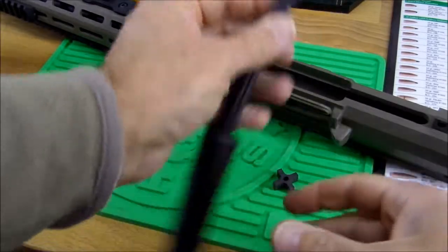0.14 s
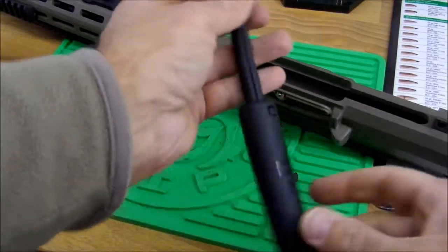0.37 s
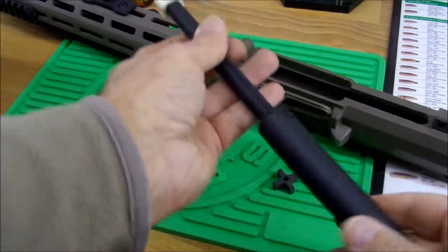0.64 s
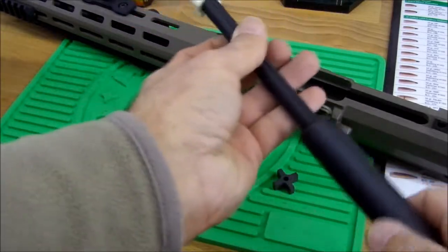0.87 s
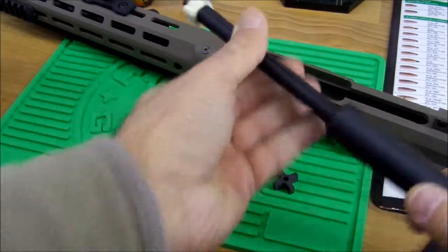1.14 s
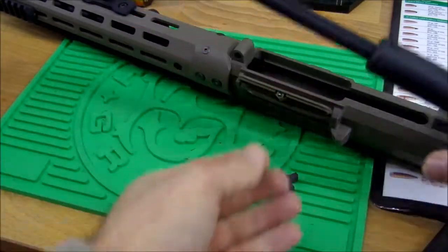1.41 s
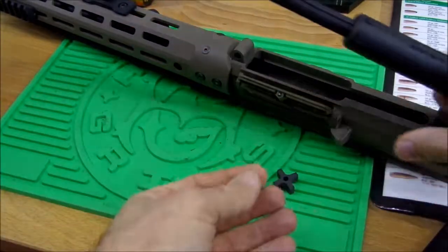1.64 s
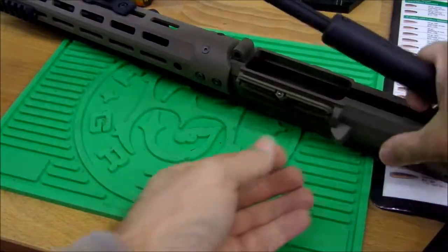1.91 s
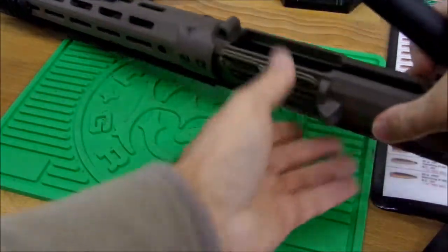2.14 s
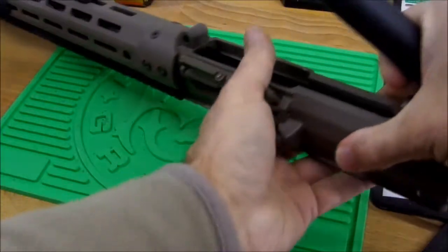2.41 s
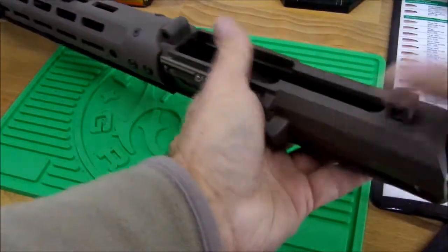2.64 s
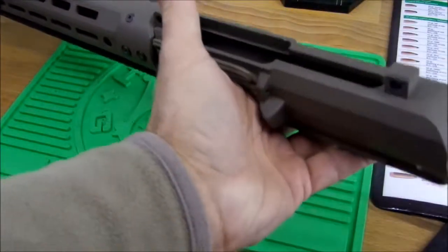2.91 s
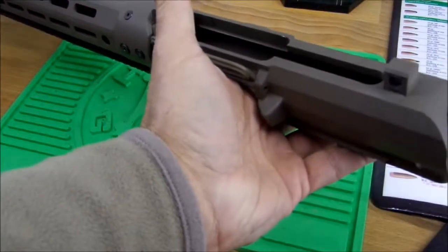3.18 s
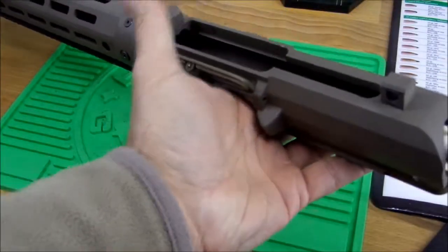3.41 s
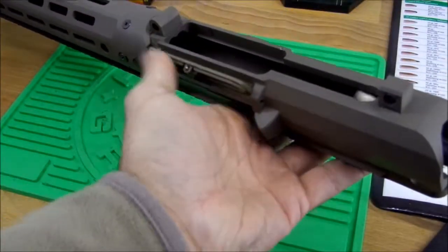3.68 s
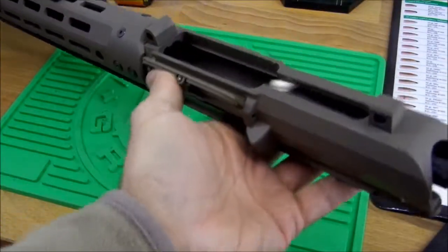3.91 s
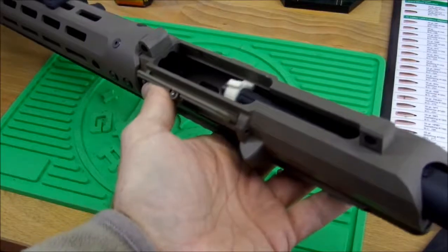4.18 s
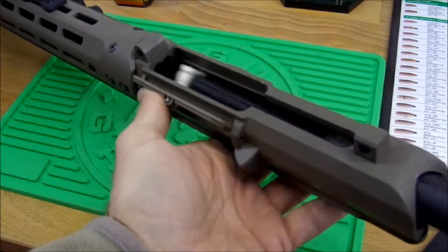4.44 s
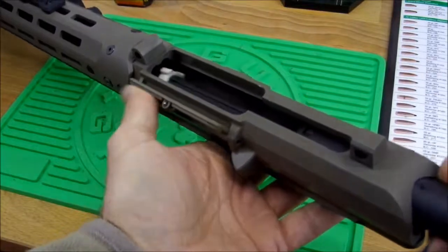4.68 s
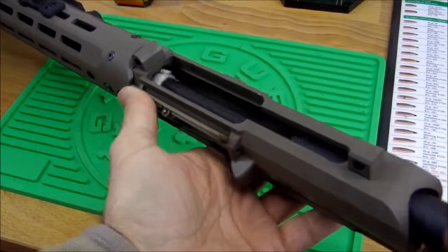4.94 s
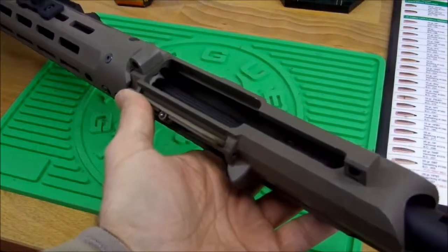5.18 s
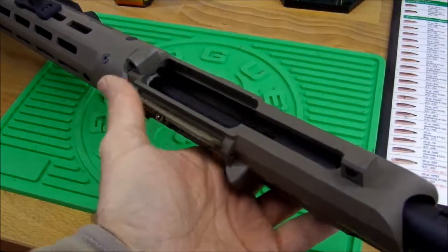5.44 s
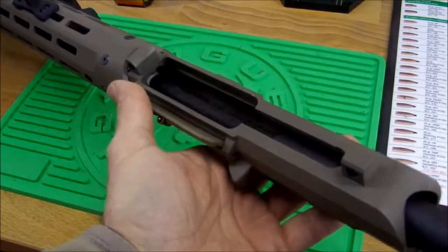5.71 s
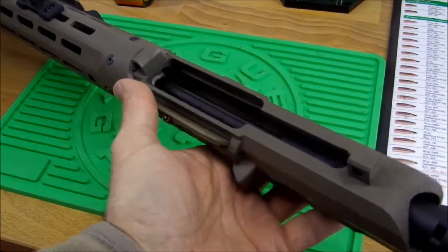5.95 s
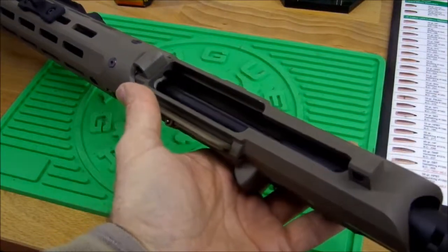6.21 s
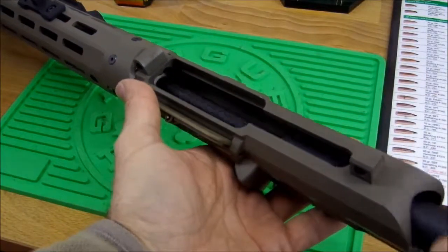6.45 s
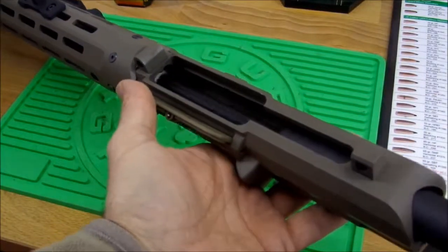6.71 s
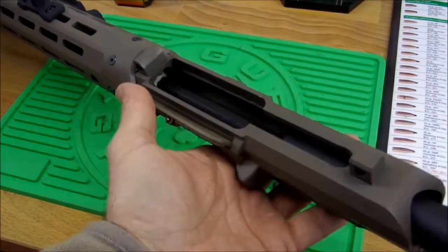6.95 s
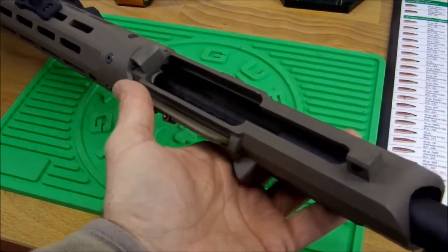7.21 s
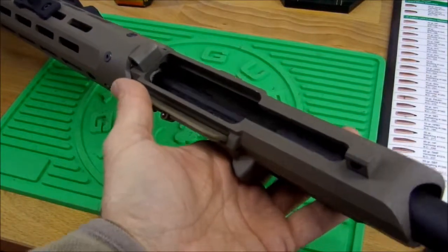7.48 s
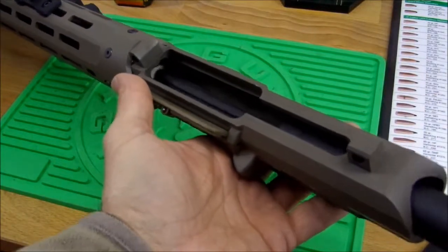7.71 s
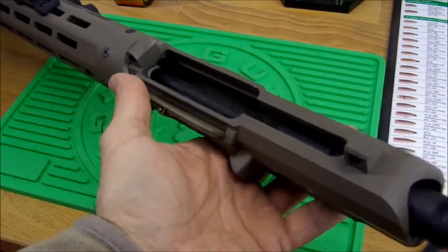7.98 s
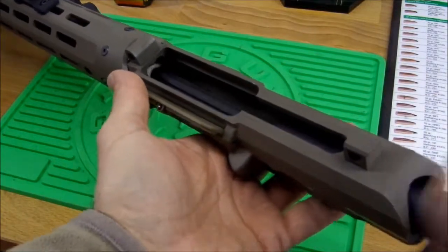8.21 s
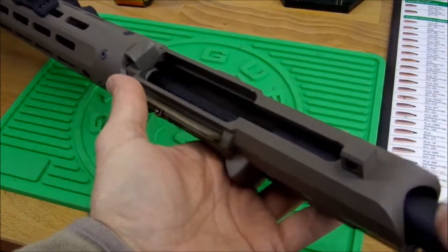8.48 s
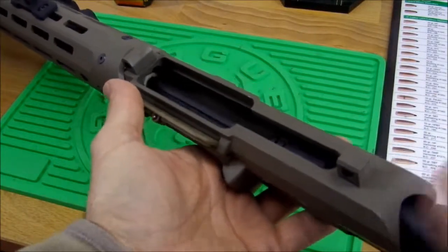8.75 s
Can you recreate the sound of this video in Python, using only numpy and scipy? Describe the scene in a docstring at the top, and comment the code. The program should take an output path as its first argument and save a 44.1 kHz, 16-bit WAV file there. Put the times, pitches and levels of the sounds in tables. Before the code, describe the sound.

Close up in a small quiet room with a faint hum, hands faintly rustle around a plastic rod. A metal part shifts off a rubber mat with light taps, a low thud and a brief chatter. The cloth-tipped rod then slides in with loud hollow clacks, followed by repeated dry scrubbing twists and irregular metallic knocks until the end.

```python
"""Cleaning a hollow metal receiver

A hollow metal receiver is lifted off a rubber mat on a wooden bench; a plastic rod with a cloth tip is slid in
and twisted. Knocks are contact noise plus decaying tube modes; the cloth is shaped noise that also shakes the modes.
Taps, bench thuds, thin rough tones, chatter and squeaks are decaying modes or noise in narrow resonances.
A quiet small room with a faint hum, one close microphone."""
import sys
import numpy as np
from scipy import signal
from scipy.fft import rfft, irfft
from scipy.io import wavfile
from scipy.ndimage import uniform_filter1d

SR = 44100
rng = np.random.default_rng(int(sys.argv[2]) if len(sys.argv) > 2 else 0)


def to_linear_factor(level_db):
    """Convert decibel levels (scalar or array-like) to linear amplitude factors."""
    exponent = np.asarray(level_db, float) / 20
    return 10 ** exponent


def master_out(mix):
    """Clip the mix to full scale and print it as 16-bit PCM to the path in sys.argv[1]."""
    frames = np.transpose(np.atleast_2d(mix))
    ceiling = np.clip(frames, -1, 1)
    pcm = np.round(ceiling * 32767).astype(np.int16)
    wavfile.write(sys.argv[1], SR, pcm)


N = 390726  # samples
PRE_SAMPLES = 256  # silence ahead of each blow
MAIN_RING_HZ = 1600, 1900

# Rod knocks on the receiver; dull part follows level, other parts relative to level before the hollow colour:
# start_s, level_db (1-2.2 kHz peak), middle_db, bright_db, sharp_db, main_ring_db, upper_modes_db
KNOCKS = [(3.3809, -57, 3, 10, 10, -3, 3), (3.6137, -62, 6, 12, 3, -3, 0),
          (3.9963, -27, -19, -11, -12, 0, -4), (4.0002, -12, -18, -14.5, -16, -6, 2),
          (4.2538, -55, -4, 11, 16, -3, 4), (4.282, -41.5, -12, -16, -3, -18, 0),
          (4.361, -55.5, -7, 14, 17, -3, 9), (4.412, -60, 9, 19, 19, -7, -3),
          (4.477, -44.5, 3, -9, 2, -12, 2), (4.5255, -38, -6, 2, -2, -4, 0),
          (4.529, -13.5, -2.5, 10, 7, -6, -3), (4.9807, -9.5, -21.5, -10.5, -34, -2, 3),
          (5.01, -19.5, 5.5, 1, -11, -13, -8), (5.0116, -23, -7, 7.5, 0.5, 2, 2),
          (5.105, -42.5, -4, 9, -2, -3, -4), (5.147, -38, 0, 3.5, -33, -9, -6),
          (5.162, -25.5, -52, -26, -31, -1, 15), (5.31, -12.5, 4, -12, -28, 0, 4),
          (5.392, -49, 2, -8, -14, -3, 0), (5.456, -26, -17, -12, -24, -1, 0),
          (5.7515, -24, -15, -19, -17, -5, -4), (5.945, -31, -4, -7, -14, -6, 0),
          (5.951, -14.5, -0.5, -2, -18, -16, 2), (5.971, -11, 3, -3, -10.5, -9, -1),
          (5.984, -26, -5, -14, -22, -4, -5), (6.3343, -33.5, -15, -16, -17, 3, -6),
          (6.3902, -35, -23, -5, -11, 11, -3), (6.509, -32, -7, 7, -17, -3, -2),
          (6.693, -21, -28, -39, -25, 0.5, 0), (6.8305, -5.5, -24, -9, -26, 0, 4.5),
          (6.873, -25.5, -24, -18, -30, -6, 0), (6.98, -21, -38, -15, -28, -19, 12),
          (7.1886, -33, -22, -15, -15, -12, 0), (7.6322, -21, -21, -8, -45, -5, 11),
          (7.7254, -27.5, -21, -3, -14, 1, 6), (7.912, -30.5, -20, -16, -20, -10, 0),
          (7.9163, -21, -31, -16, -19, -15, 10), (8.0348, -8, -22, -15, -18, 6, 2.5),
          (8.11, -9.5, 2.5, 6.5, -8, -1, 3.5), (8.1187, -34, 7, 3, -20, 0, 21),
          (8.198, -22, -6, 1, -23, -8, -3), (8.2161, -8.5, -18, -8.5, -27, -0.5, -5),
          (8.2382, -18, -5, -16, -30, -8, 0), (8.4505, -28.5, -41, -17, -14, -13, 8),
          (8.4633, -18.5, -41, -19, -19, -3, 19), (8.741, -15, 1, 7, -14, -9.5, 0.5),
          (8.7656, -13, -19, -6, -28, 1.5, -8), (8.8468, -43, 17, 5, -20, -1, 6)]
# Taps of parts held by mat or hand: start_s, level_db (as above), dull_db, middle_db, bright_db, sharp_db
TAPS = [(1.333, -54.5, -11, 5, 9.5, 7), (1.5435, -53, -4, -2, 7, 6), (1.5786, -53, -3, 6, 10, -10),
        (1.928, -43, 2, 2, 1, -3), (1.9601, -41, -2, 8, 4, -18), (1.9776, -44, 2, 7, 4, -4),
        (2.0062, -30, 4.5, 1, 7.5, -5), (2.163, -30, -10, -2, -0.5, -42), (2.785, -47.5, 1, 1, -6, 10),
        (2.923, -52, 11, 4, -12, 8)]
# Edges of the dull, ring, middle, bright and sharp bands: edge_hz
BAND_EDGES_HZ = [200, 1000, 2200, 3400, 8000, 15000]
# Hollow colour of every blow: freq_hz, gain_db
HOLLOW = [(450, -1.6), (900, 0.5), (1150, -0.5), (2850, -0.6), (3250, -2), (3600, -2.4), (4600, 2),
          (4950, 1.5), (5300, -3.4), (5800, -1), (6600, -1)]
# Receiver modes, one list each: freq_hz, size_db before the blow's offsets, t60_s before stretch
MODE_HZ, MODE_DB, MODE_T60_S = [312, 600, 780, 920, 1060, 1395, 1538, 1650, 1720, 1757, 1796, 1980, 2138,
                                2437, 2590, 2712, 3020, 3690, 3930, 4175, 4320, 4507, 4620, 4890, 5015,
                                5075, 5460, 5889, 6220, 6810, 7105, 7500], [-13.5, -19, -25, -5, -3.5, -1.5, -2, 2, -7.5, 12.5,
                                                     4.5, -2, -6.5, -14, -4.5, -0.5, -17, -6.5, -4.5, -8,
                                                     -33, -9.5, -18, -1.5, -2, -2, 1, 9.5, 1.5, 9.5, -3, 5], [0.53, 0.32, 0.044, 0.087, 0.12,
                                                                          0.15, 0.11, 0.032, 0.13, 0.16,
                                                                          0.18, 0.037, 0.15, 0.085, 0.059,
                                                                          0.14, 0.37, 0.068, 0.087, 0.07,
                                                                          0.067, 0.19, 0.1, 0.14, 0.045,
                                                                          0.069, 0.13, 0.033, 0.14, 0.076,
                                                                          0.14, 0.069]
# Bench-top modes: freq_hz, size_db, t60_s before stretch
BENCH = [(40.2, 2, 0.29), (69.7, -3.5, 0.34), (104, 1.5, 0.217), (143, 7.5, 0.11), (227, 10.5, 0.23),
         (244.4, 7.5, 0.31), (281, -2.5, 0.23), (333, -6, 0.12), (390, 3, 0.063), (483, 2, 0.074),
         (663, -12, 0.044), (880, 2.5, 0.042)]
# Cloth strokes along the bore, a table each, control levels: time_s, hiss_db, tube_db, wall_db, rail_db
STROKES = [
    [(3.41, -71, -66, -80, -77), (3.424, -62, -59, -77, -61), (3.508, -50, -70, -72, -51),
     (3.6, -57, -68, -72, -59), (3.622, -51, -57, -69, -51), (3.666, -53, -55, -58, -53),
     (3.69, -51, -39, -64, -60), (3.71, -60, -42, -67, -41), (3.73, -60, -59, -67, -67),
     (3.764, -55, -68, -73, -62), (3.822, -51, -66, -71, -66), (3.864, -49.5, -57, -63, -64),
     (3.886, -46.5, -60, -53, -62), (3.918, -50, -60, -52, -60), (3.976, -49, -62, -56, -55),
     (3.98, -41, -52, -63, -62)],
    [(4.016, -45, -40, -53, -38), (4.036, -47.5, -37, -48, -51), (4.096, -51, -47, -63, -56),
     (4.15, -50.5, -45, -71, -58), (4.176, -61, -46, -57, -63), (4.192, -53, -50, -69, -67),
     (4.216, -77, -64, -76, -64), (4.24, -66, -68, -76, -74)],
    [(5.39, -65, -62, -71, -63), (5.412, -50, -42, -61, -47), (5.434, -62, -67, -72, -68),
     (5.456, -50.5, -51, -59, -65), (5.538, -47, -54, -60, -62), (5.572, -42, -38, -35.5, -48),
     (5.6, -42, -45, -37, -58), (5.634, -48.5, -65, -55, -66), (5.672, -39, -47, -45, -48),
     (5.72, -41, -45, -37, -48), (5.746, -42.5, -42, -47, -54), (5.792, -36, -26.5, -30, -29.5),
     (5.818, -36, -47, -38, -34), (5.846, -44, -36, -48, -56), (5.892, -67, -63, -68, -64),
     (5.925, -50, -51, -63, -67)],
    [(6.33, -59, -54, -63, -74), (6.374, -47.5, -51, -63, -59), (6.408, -43.5, -32, -40, -46),
     (6.446, -49, -47, -49, -59), (6.482, -38, -32, -40, -45), (6.496, -40.5, -42, -47, -52),
     (6.518, -45, -36, -43, -38), (6.554, -47, -46, -47, -58), (6.576, -44, -59, -47, -58),
     (6.604, -43.5, -36, -34, -48), (6.624, -45, -38, -48, -54), (6.662, -49.5, -73, -61, -67),
     (6.696, -52.5, -51, -56, -70), (6.732, -54, -46, -63, -68), (6.758, -80, -58, -73, -74),
     (6.79, -61, -43, -62, -64)],
    [(7.13, -69, -58, -56, -73), (7.15, -64, -71, -63, -65), (7.188, -43.5, -57, -55, -53),
     (7.236, -41.5, -38, -34, -41), (7.26, -47, -42, -53, -60), (7.286, -43, -43, -48, -51),
     (7.318, -39, -30, -39, -45), (7.344, -40, -41, -37, -43), (7.368, -38.5, -42, -35.5, -43),
     (7.4, -38, -45, -40, -36), (7.418, -39, -39, -29, -30), (7.44, -38, -31.5, -35.5, -37),
     (7.462, -39.5, -75, -60, -61), (7.48, -41.5, -24.5, -51, -45), (7.526, -60, -83, -67, -69),
     (7.56, -55, -65, -65, -65)],
    [(7.78, -55, -57, -69, -70), (7.798, -74, -70, -63, -70), (7.826, -48, -57, -47, -54),
     (7.868, -43, -45, -53, -57), (7.892, -45, -69, -56, -63), (7.906, -44, -57, -59, -55),
     (7.924, -43, -45, -49, -51), (7.97, -37, -46, -35, -36.5), (7.984, -36, -54, -43, -45),
     (8.012, -38.5, -68, -50, -50), (8.02, -33, -55, -52, -54), (8.026, -33, -48, -49, -54)],
    [(8.056, -40, -40, -44, -53), (8.074, -43, -62, -50, -55), (8.09, -60, -54, -58, -63)],
    [(8.31, -77, -47, -74, -72), (8.338, -57, -60, -61, -61), (8.372, -48, -50, -42, -58),
     (8.388, -50, -44, -54, -42), (8.41, -43.5, -47, -49, -56), (8.436, -49, -69, -57, -61),
     (8.46, -45, -60, -51, -61), (8.484, -41.5, -56, -48, -53), (8.506, -41, -28, -43, -40),
     (8.528, -37.5, -30.5, -34, -44), (8.546, -41, -50, -36, -38), (8.564, -38, -52, -40, -42),
     (8.588, -37.5, -38, -37, -44), (8.604, -39.5, -35, -47, -53), (8.668, -55.5, -61, -63, -65),
     (8.71, -55, -63, -61, -58)],
]
# Extra scrub per stroke: extra_db
BEARING_DB = [-3, -1, 0.5, 0.5, -2, 0, 1.5, 1]
# Short brushes of fingers and rod, control levels: peak_s, length_s, hiss_db, rail_db, tube_db
BRUSHES = [(0.082, .15, -65.5, -88, -84), (0.392, 0.83, -66, -84, -71), (0.423, 0.063, -64, -57, -64),
           (.556, .1, -68, -76, -83), (.855, .16, -61.5, -82, -69), (1.255, 0.076, -60, -78, -90),
           (1.36, .12, -66, -78, -72), (1.504, .05, -66, -86, -90), (1.592, 0.082, -58.5, -54, -58),
           (1.8, 0.95, -70, -65, -72), (2.052, 0.26, -58.5, -53, -60), (2.237, 0.28, -57, -62, -63),
           (2.35, 0.18, -60, -58.5, -58), (2.556, 0.17, -57, -60, -50), (2.621, 0.061, -44, -57, -48.5),
           (2.77, 0.15, -58, -66, -74), (2.835, 0.18, -59, -73, -72), (2.92, 0.23, -66, -61, -69),
           (3.012, 0.11, -66, -71, -73), (4.3, 0.08, -55, -68, -57), (4.454, 0.082, -51.5, -67, -70),
           (4.747, 0.17, -50, -54.5, -50.5), (4.971, 0.09, -44.5, -38.5, -59), (5.139, 0.34, -58, -60, -53),
           (6.255, 0.048, -62, -54, -45.5), (6.81, 0.081, -55.5, -53, -40.5), (7.092, 0.066, -54, -57, -50),
           (7.61, 0.098, -63, -50, -51), (8.17, .06, -66, -53, -56), (8.81, 0.053, -60, -52, -52)]
# Hands at rest on the parts, control levels: time_s, hiss_db, tube_db, rustle_db
GRIP = [(0, -79, -86, -64.5), (.7, -82, -93, -64.5), (1.45, -80, -84, -64.5), (1.9, -69, -72, -60),
        (2.2, -65, -72, -53.5), (2.5, -68, -74, -61), (2.8, -69, -74, -58), (2.92, -68, -74, -56),
        (3.15, -78, -82, -63), (3.4, -71, -70, -61.5), (3.75, -48, -74, -53.5), (4.35, -65.5, -64, -57),
        (4.85, -72, -76, -58), (5.5, -59, -62, -52.5), (6.198, -60.5, -62, -57), (6.499, -58, -67, -54.5),
        (7.2, -58, -64, -54.5), (7.9, -56.5, -61, -53), (8.86, -61.5, -57, -55.5)]
# Layers following the cloth: level_db at hiss = tube = -40 dB, hiss_slope in dB/dB, tube_slope in dB/dB
SCRUB_LAW, WALL_LAW = (-41, 1.15, 0.14), (-33, 1.2, 0.93)
RAIL_LAW, FIZZ_LAW = (-42, 0.77, 0.33), (-39, 1.3, 0.05)
# Parts settling after a knock, as tube ring, low rustle and quick woody rustle: rel_knock_db, t60_s
SETTLE_RING, SETTLE_RUSTLE = (-41.5, 0.89), (-40, 0.91)
SETTLE_CLATTER = (-31.5, 0.21)
# Relative noise spectra of the cloth and the rustle: freq_hz, density_db per Hz
HISS, SCRUB = [(4120, -79), (7000, -3.5), (9250, -10), (10400, -8.5), (11700, -8), (14200, -8.5),
               (15600, -8)], [(1000, -15.5), (2200, -18), (3500, -9.5), (5000, -6.5), (6500, 0.5),
                             (7600, -7.5), (8400, -28), (10000, -25)]
FIZZ, RUSTLE = [(7000, -60), (10000, -18), (12500, -9), (14500, 0), (15700, -2)], [(76, -8.5), (130, -2), (171, -9.5), (317, 3.5), (381, -5), (585, -2.5),
                              (779, -8.5), (1290, -7.5), (1380, -9.5), (1500, -8), (1950, -12), (2600, -15),
                              (3300, -60)]
# Tip rasping over the tube mouth: time_s, freq_hz, level_db
RASP = [(3.45, 4360, -63), (3.514, 4230, -62), (3.606, 4260, -61), (3.632, 4190, -48), (3.652, 4260, -60),
        (3.672, 4320, -46), (3.724, 4290, -72), (3.744, 4270, -55), (3.85, 4280, -53), (3.94, 4370, -53),
        (3.985, 4430, -57)]
# Bench taking the weight: start_s, peak_db
THUDS = [(1.558, -49), (2.004, -18), (2.043, -36), (2.067, -30.5), (2.089, -33), (2.147, -36), (2.9, -49),
         (2.951, -47.5)]
# Long thin parts singing as moved, and the steady top of the fingertip squeak near 12.7 kHz: freq_hz per tone;
# width_hz per tone; a table per tone of time_s, level_db
SINGING_HZ, SINGING_WIDTH_HZ = [2297, 1073, 6820, 3390, 12700, 6280, 4900, 4880, 2150], [36, 25, 70, 70, 400, 90, 120, 110, 80]
SINGING = [
    [(1.55, -74), (1.66, -65), (1.8, -60), (2.066, -50), (2.156, -56), (2.3, -54), (2.4, -77)],
    [(2.15, -68), (2.22, -53), (2.28, -65), (2.34, -59), (2.44, -67), (2.53, -52), (2.62, -65), (2.75, -62)],
    [(2.19, -62), (2.224, -52), (2.278, -75), (2.37, -58), (2.42, -76)],
    [(3.0, -81), (3.058, -66), (3.198, -68), (3.41, -65)],
    [(2.8, -67), (2.848, -47), (2.872, -53), (2.89, -66)],
    [(1.54, -62), (1.548, -52), (1.57, -74)],
    [(1.545, -68), (1.575, -66), (1.6, -52), (1.62, -76)],
    [(2.6, -62), (2.62, -44), (2.66, -57)],
    [(1.54, -61), (1.6, -55), (1.7, -70), (1.96, -62), (2.1, -62), (2.3, -61), (2.4, -60), (2.5, -66),
     (2.65, -60)],
]
# Loose parts chattering on the bench, a table each: time_s, level_db
CHATTER = [
    [(1.94, -58), (1.948, -46), (1.955, -53), (1.962, -40), (1.972, -39), (1.99, -58), (2.0, -62)],
    [(2.008, -44), (2.03, -54), (2.05, -45), (2.062, -44), (2.075, -43), (2.09, -60), (2.14, -58),
     (2.2, -68)],
]
# Fingertip squeaks on metal, and the high pip of a light tap (last table), a table each: time_s, freq_hz,
# level_db
SQUEAKS = [
    [(2.844, 10750, -52), (2.85, 10850, -45), (2.873, 11500, -43), (2.879, 11600, -52)],
    [(2.815, 7350, -62), (2.832, 7200, -58), (2.842, 6950, -50), (2.855, 6800, -62)],
    [(2.868, 13300, -60), (2.878, 13500, -53), (2.888, 13600, -62)],
    [(2.781, 7900, -56), (2.785, 7950, -46), (2.791, 8000, -60)],
]
# Relative room noise spectrum: freq_hz, density_db per Hz
ROOM = [(12, -18), (20, 5.5), (47, 0.5), (66, -6.5), (126, -40), (186, -6.5), (316, -5), (394, -9.5),
        (599, -22), (651, -10.5), (962, -22), (1540, -22), (3010, -20), (7350, -26.5), (15600, -25)]
# Mains hum: freq_hz, rms_db
HUM = [(120, -72.5), (360, -78), (600, -72)]


def slide():
    """Fibres catch and slip: dense grains hiss, shake the tube's modes and rustle."""
    levels_db = controls()
    hiss, fizz, scrub, wall, rail, tube, rustle = to_linear_factor(levels_db)
    grip = flutter(0.44, 250) * slips()
    cloth = cloth_noise(hiss, fizz, scrub)
    metal = bore_ring(grip, scrub, wall, rail, tube)
    load = to_linear_factor(uniform_filter1d(levels_db[-1], SR // 3) - 4)  # the hands' slow load on the bench
    bench = rubbed(BENCH[:3], load, 0.96, 0.62)
    low_rustle = to_linear_factor(1.0) * rustle * coloured(rng.standard_normal(N), RUSTLE)
    return patchy(grip * cloth, 1.8) + metal + bench + low_rustle


def cloth_noise(hiss, fizz, scrub):
    """Dry fibre noise: three shaped noises under their own levels."""
    noise = rng.standard_normal((3, N))
    sound = hiss * coloured(noise[0], HISS)
    sound += fizz * coloured(noise[1], FIZZ)
    return sound + to_linear_factor(2.0) * scrub * coloured(noise[2], SCRUB)


def bore_ring(grip, scrub, wall, rail, tube):
    """Friction drives the receiver's modes, range by range."""
    lo_hz, hi_hz = MAIN_RING_HZ
    shake = flutter(2.6, 500) * slips()
    metal = rubbed(between(4700, 5200), to_linear_factor(-4.0) * wall * grip, 0.61, 3.8)  # tube walls
    metal += rubbed(between(3400, 4700), to_linear_factor(-7.5) * rail * grip, 0.12, 3.3)  # rails inside
    metal += rubbed(between(5200, 8000), to_linear_factor(-2.5) * scrub * grip, 0.35, 5.6)
    metal += rubbed(between(lo_hz, hi_hz), to_linear_factor(-5.5) * tube * shake, 0.42, 4)
    others = between(0, lo_hz) + between(hi_hz, 3400)
    return metal + rubbed(others, to_linear_factor(-7.5) * np.sqrt(tube * scrub) * shake, 0.41, 4.6)


def controls():
    """Levels in dB of hiss, fizz, scrub, wall, rail, tube, rustle: gesture powers add, laws do the rest."""
    t = np.arange(0, N / SR + .002, .001)
    s, *rest_db = np.transpose(GRIP)
    hiss, tube, rustle = to_linear_factor([2 * np.interp(t, s, db) for db in rest_db])
    rail, bearing_db = np.zeros((2, len(t)))
    for s, length_s, hiss_db, rail_db, tube_db in BRUSHES:
        shape = to_linear_factor(2 * -14.5 * abs(2 * (t - s) / length_s) ** 1.12)  # -14.5 dB at either end
        hiss = hiss + shape * to_linear_factor(2 * hiss_db)
        rail = rail + shape * to_linear_factor(2 * rail_db)
        tube = tube + shape * to_linear_factor(2 * tube_db)
    for s, db, *_ in KNOCKS:
        since_s = np.where(t > s, t - s, 99)
        tube = tube + settling(db, since_s, SETTLE_RING)
        rustle = rustle + settling(db, since_s, SETTLE_RUSTLE) + settling(db, since_s, SETTLE_CLATTER)
    # walls and rails follow the lighter gestures; strokes set theirs directly
    wall = to_linear_factor(2 * follow(WALL_LAW, hiss, tube))
    rail = rail + to_linear_factor(2 * follow(RAIL_LAW, hiss, tube))
    for rows, extra_db in zip(STROKES, BEARING_DB):
        s, *columns_db = np.transpose(rows)
        stroke = [to_linear_factor(2 * np.interp(t, s, db, -150, -150)) for db in columns_db]
        hiss, tube, wall, rail = (p + q for p, q in zip((hiss, tube, wall, rail), stroke))
        bearing_db = bearing_db + extra_db * ((t > s[0]) & (t < s[-1]))
    hiss_db, wall_db, rail_db, tube_db, rustle_db = 10 * np.log10([hiss, wall, rail, tube, rustle])
    fizz_db = follow(FIZZ_LAW, hiss, tube)
    scrub_db = follow(SCRUB_LAW, hiss, tube) + bearing_db
    levels_db = hiss_db, fizz_db, scrub_db, wall_db, rail_db, tube_db, rustle_db
    return [np.interp(np.arange(N) / SR, t, db) for db in levels_db]


def settling(knock_db, since_s, law):
    """Decaying power left by a knock as the parts settle."""
    rel_db, t60_s = law
    return to_linear_factor(2 * (knock_db + rel_db - 60 * since_s / t60_s))


def follow(law, hiss, tube):
    """Level in dB of a layer from the powers of hiss and tube ring."""
    return law[0] + law[1] * (10 * np.log10(hiss) + 40) + law[2] * (10 * np.log10(tube) + 40)


def flutter(db, samples):
    """A gain wandering by db (standard deviation of its knots), a knot every so many samples."""
    knots = rng.standard_normal(N // 100 + 2)
    return to_linear_factor(db * np.interp(np.arange(N) / samples, np.arange(len(knots)), knots))


def slips():
    """Stick and slip: a gain that jumps at random catches and dies away at once."""
    rate_per_s, spread_db, decay_s = 200, 1, 0.0003
    size = to_linear_factor(spread_db * np.minimum(rng.exponential(1, N), 2.8))
    catches = size * (rng.random(N) < rate_per_s / SR)
    return evened(1 + 0.5 * signal.lfilter([1], [1, -np.exp(-1 / (decay_s * SR))], catches))


def rubbed(modes, level, stretch, wander_db):
    """Friction shakes the modes; as the contact wanders, each swells and fades by itself."""
    t = np.arange(SR // 4) / SR
    out, power = np.zeros(N), 0
    push = level * rng.standard_normal(N)
    for mode in modes:
        ring = ringing([mode], t, 0, stretch)
        out += signal.oaconvolve(push * flutter(wander_db, 1500), ring)[:N]
        power += (ring ** 2).sum()
    return out / np.sqrt(power)


def patchy(x, db):
    """Uneven weave: patches of the spectrum come and go."""
    z = signal.stft(x, nperseg=256)[2]
    patches = uniform_filter1d(rng.standard_normal(z.shape), 4, 0)
    patches = evened(uniform_filter1d(patches, 12, 1))
    return signal.istft(z * to_linear_factor(db * patches), nperseg=256)[1][:N]


def between(lo_hz, hi_hz):
    """The receiver's modes in a range."""
    return [mode for mode in zip(MODE_HZ, MODE_DB, MODE_T60_S) if lo_hz < mode[0] <= hi_hz]


def ringing(modes, t, spread_db, stretch, detune=0.0018):
    """Modes set off at once as decaying sines, sizes and pitches varied at random."""
    hz, db, t60_s = np.array(modes).T[:, :, None]
    luck = rng.standard_normal((2, len(modes), 1))
    turns = hz * (1 + detune * luck[1]) * t
    envelope = to_linear_factor(db + spread_db * luck[0] - 60 * t / (t60_s * stretch))
    return (envelope * np.sin(2 * np.pi * turns)).sum(0)


def knock(db, dull_db, mid_db, bright_db, sharp_db, main_db, upper_db, ring_db, haze_t60_s):
    """A crack of contact, the ring of the tube and a rattling haze, coloured by the blow."""
    t = np.arange(2 ** 14 - PRE_SAMPLES) / SR
    noise = rng.standard_normal((2, len(t)))
    crack = to_linear_factor(19) * noise[0] * to_linear_factor(-60 * t / 0.023)
    crack[:2] += to_linear_factor(29.5 + 0.1 * mid_db) * np.array([1, -.4])  # first touch, sharper with a strong middle
    haze = to_linear_factor(13.0) * signal.lfilter([.45], [1, -.55], noise[1]) * to_linear_factor(-60 * t / haze_t60_s)
    lo_hz, hi_hz = MAIN_RING_HZ
    modes = [(f, size_db + main_db * (lo_hz < f <= hi_hz) + upper_db * (f > hi_hz), t60_s)
             for f, size_db, t60_s in between(0, SR)]
    # the spot struck changes each mode by 4 dB
    ring = sum(ringing(modes, t, 4, stretch, 0.0062) for stretch in (.28, .44))
    ring *= to_linear_factor(ring_db - 0.19 * (mid_db + 12.0)) * (1 - np.exp(-t / 0.0034))  # a strong middle leaves less ring
    return blow_colour(ring + crack + haze, db + np.array([dull_db, 0, mid_db, bright_db, sharp_db]))


def blow_colour(x, bands_db):
    """Scales the peak of each band, joins the gains smoothly and adds the hollow colour."""
    spectrum = rfft(np.r_[np.zeros(PRE_SAMPLES), x])
    hz = np.fft.rfftfreq(len(x) + PRE_SAMPLES, 1 / SR)
    lo, hi = BAND_EDGES_HZ[:-1], BAND_EDGES_HZ[1:]
    peaks = [abs(irfft(spectrum * ((hz > a) & (hz < b)))).max() for a, b in zip(lo, hi)]
    gains_db = bands_db - 20 * np.log10(peaks)
    low = [(40, gains_db[0] - 70), (80, gains_db[0] - 31), (240, gains_db[0] - 3.5)]
    plateaus = [(f, g) for a, b, g in zip(lo, hi, gains_db) for f in (a * 1.217, b / 1.377)]
    return irfft(spectrum * to_linear_factor(read(low + plateaus[1:], hz) + read(HOLLOW, hz)))


def rod_knock(db, *blow):
    """The rod strikes the free tube, which rings; softer knocks are duller."""
    dull_db = -13 - 0.36 * (db + 11.0)
    return knock(db, dull_db, *blow, ring_db=4.0, haze_t60_s=0.056)


def held_tap(*blow):
    """A tap on a held part, which hardly rings."""
    return knock(*blow, main_db=-3, upper_db=3, ring_db=-31, haze_t60_s=0.082)


def thud(db):
    """A soft push of under a millisecond sets off the bench-top modes."""
    t = np.arange(SR // 2) / SR
    sound = np.convolve(ringing(BENCH, t, 1.1, 0.75), np.hanning(40))[:len(t)]
    sound *= 1 - np.exp(-t / 0.0053)
    return to_linear_factor(db) * sound / abs(sound).max()


def rasp():
    """The tip rasps over the tube mouth: a rough band that drifts as it goes in."""
    return tone(RASP, 140, steady=0)


def singing(hz, width_hz, rows):
    """A long thin part sings as it is moved, or the fingertip squeak holds its top: a faint rough tone at one
    pitch."""
    return tone([(s, hz, db) for s, db in rows], width_hz, steady=.3)


def chatter(rows):
    """Loose parts chatter on the bench: a hollow rough band."""
    return tone([(s, 767, db) for s, db in rows], 300, steady=0)


def squeak(rows):
    """A fingertip squeak on metal or the high pip of a light tap: a gliding tone, mostly steady."""
    return tone(rows, 100, steady=1.5)


def tone(rows, width_hz, steady):
    """Start and samples of a rough tone: noise in a narrow gliding resonance plus a steady part."""
    s, hz, db = np.transpose(rows)
    t = np.arange(s[0], s[-1], 1 / SR)
    a, b = rng.standard_normal((2, len(t) + SR // 4))
    r = np.exp(-np.pi * width_hz / SR)
    fuzz = signal.lfilter([np.sqrt((1 - r ** 2) / 2)], [1, -r], a + 1j * b)[SR // 4:]
    turn = np.exp(2j * np.pi * np.cumsum(np.interp(t, s, hz)) / SR)
    level = to_linear_factor(np.interp(t, s, db)) * signal.windows.tukey(len(t), .2)
    return s[0], level * (turn * (steady + fuzz)).real


def walls(x):
    """A short tail of reflections, decay time depending on frequency."""
    hz, t, z = signal.stft(rng.standard_normal(SR // 2), SR, nperseg=256)
    t60_s = read([(200, 0.1), (2000, 0.23), (12000, 0.2)], hz)[:, None]
    decaying = signal.istft(z * to_linear_factor(-60 * t / t60_s), SR, nperseg=256)[1]
    tail = np.r_[np.zeros(150), decaying]
    return signal.oaconvolve(x, tail / np.linalg.norm(tail))[:N]


def air():
    """Steady shaped room noise with a faint mains hum of sines."""
    t = np.arange(N) / SR
    hum = sum(np.sqrt(2) * to_linear_factor(db) * np.sin(2 * np.pi * (hz * t + rng.random())) for hz, db in HUM)
    return to_linear_factor(-58.5) * coloured(rng.standard_normal(N), ROOM) + hum


def evened(x):
    """Scales to rms 1."""
    return x / np.sqrt(np.mean(x ** 2) + 1e-20)


def read(points, hz):
    """A spectrum read on a log frequency axis."""
    f, value = np.transpose(points)
    return np.interp(np.log(hz + 1), np.log(f + 1), value)


def coloured(x, points):
    """Gives x a spectrum, rms 1."""
    gain = to_linear_factor(read(points, np.fft.rfftfreq(len(x), 1 / SR)))
    return evened(irfft(rfft(x) * gain, len(x)))


def add(mix, s, sound):
    """Mixes a sound in at s seconds."""
    part = mix[round(s * SR):][:len(sound)]
    part += sound[:len(part)]


def scene():
    """Everything on the bench, its echo and the room noise."""
    mix = slide()
    for s, *blow in KNOCKS:
        add(mix, s - PRE_SAMPLES / SR, rod_knock(*blow))
    for s, *blow in TAPS:
        add(mix, s - PRE_SAMPLES / SR, held_tap(*blow))
    for s, db in THUDS:
        add(mix, s, thud(db))
    add(mix, *rasp())
    for hz, width_hz, rows in zip(SINGING_HZ, SINGING_WIDTH_HZ, SINGING):
        add(mix, *singing(hz, width_hz, rows))
    for rows in CHATTER:
        add(mix, *chatter(rows))
    for rows in SQUEAKS:
        add(mix, *squeak(rows))
    return (mix + to_linear_factor(-10.5) * walls(mix) + air())[None]


def top_cut(x):
    """Nothing passes above the cut-off."""
    return signal.sosfilt(signal.butter(12, 17020, fs=SR, output="sos"), x)


def record(dry):
    """The microphone loses the deepest bass; a steep low-pass limits the treble."""
    bass_cut = signal.butter(4, 36, "high", fs=SR, output="sos")
    x = signal.sosfilt(bass_cut, dry)
    treble_edge = signal.firwin(511, 15800, window=("kaiser", 9), fs=SR)
    finished = signal.oaconvolve(x, treble_edge[None], "same")
    return top_cut(finished)


dry = scene()
out = record(dry)
master_out(out)
```